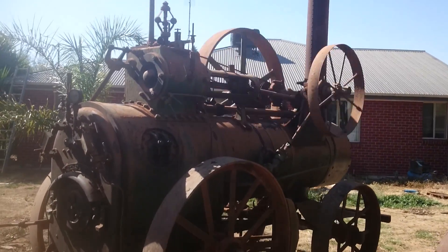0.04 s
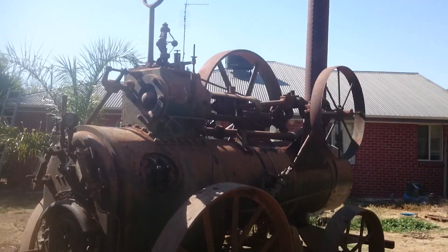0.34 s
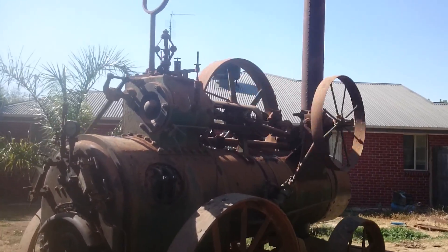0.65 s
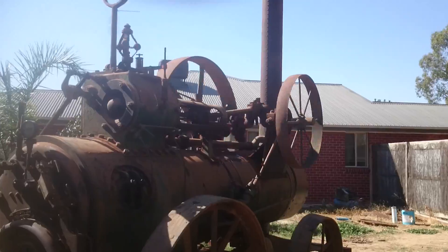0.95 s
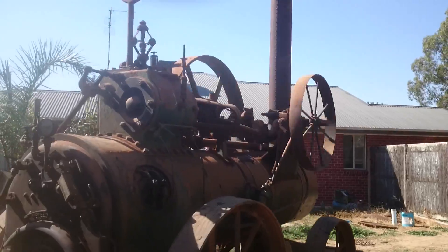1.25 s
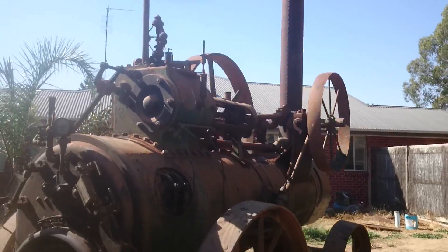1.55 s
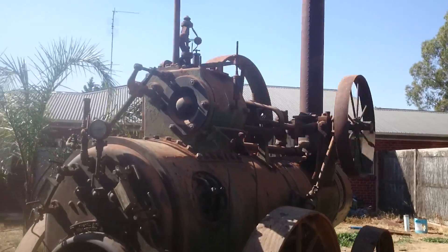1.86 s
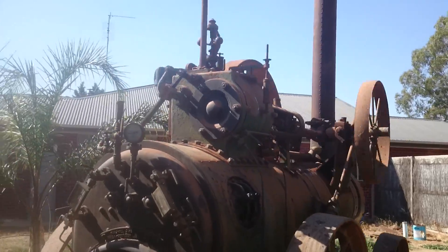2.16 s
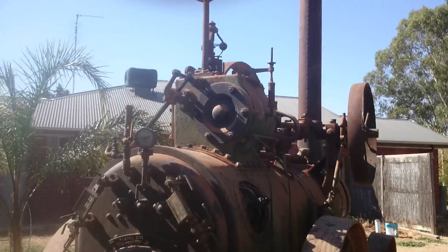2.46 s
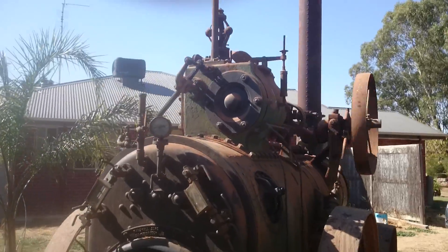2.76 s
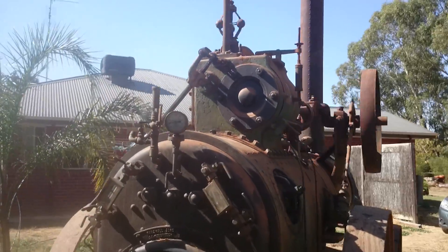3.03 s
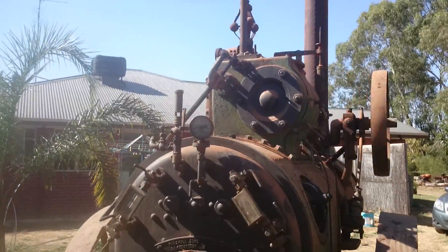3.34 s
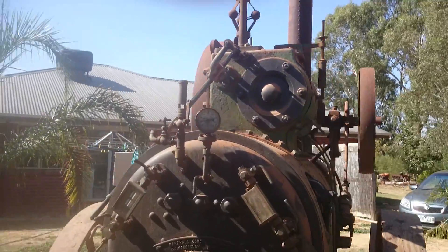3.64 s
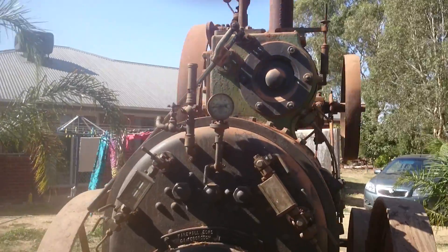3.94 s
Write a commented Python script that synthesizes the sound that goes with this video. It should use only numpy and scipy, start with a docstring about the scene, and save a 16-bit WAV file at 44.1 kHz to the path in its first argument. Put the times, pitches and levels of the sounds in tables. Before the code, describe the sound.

Steam engine ticking over outdoors, with booming puffs, metallic gear rasps and hissing steam.

```python
"""Booming chuffs and rasping gears: a portable steam engine ticks over in a yard at just under 2 turns/s.
Each stroke puffs out through the chimney and rings it; fence and house throw the boom back.
The governor gears bind and rasp about five times a second over churning bearings and swishing slides.
A steam leak hisses, a little louder as the listener walks up to the boiler."""
import sys
import numpy as np
from scipy import signal
from scipy.fft import rfft, irfft
from scipy.io import wavfile

SR = 44100
rng = np.random.default_rng(int(sys.argv[2]) if len(sys.argv) > 2 else 0)


def pcm_store(signal):
    """Save signal as 16-bit PCM."""
    levels = np.round(np.clip(np.atleast_2d(signal), -1, 1) * 32767)
    wavfile.write(sys.argv[1], SR, levels.astype(np.int16).T)


N = 176400
TIME_S = np.arange(N) / SR

# Exhaust strokes, front and back cylinder end in turn.
# Each row: start in seconds, boom in dB, rush in dB, puff in dB.
STROKES = [(0.0874, -16.5, -26.5, -36.5), (0.3493, -21.5, -27.5, -36), (0.6242, -20, -28, -33.5),
           (0.8887, -20.5, -32, -35.5), (1.1647, -18.5, -29.5, -35), (1.4293, -20, -33.5, -36),
           (1.707, -17.5, -29, -34.5), (1.970, -20, -30, -39.5), (2.244, -18, -31.5, -33.5),
           (2.5067, -21.5, -29.5, -38), (2.7835, -18.5, -26.5, -36), (3.0461, -21, -32.5, -39),
           (3.3226, -19.5, -29, -36), (3.5882, -20, -29, -39), (3.8632, -18.5, -25, -38.5)]
# Chimney modes. Each row: frequency in Hz, front-end gain in dB, back-end gain in dB,
# T60 in seconds, lag in seconds.
CHIMNEY_MODES = [(56, -5, -29, 0.15, 0.01436), (66.2, -8, 0, 0.15, -0.0051),
                 (69.2, -3, -14.5, .19, 0.00966), (118.9, -6, -4, 0.16, .0138),
                 (150, -4, -8.5, 0.081, -0.0019), (192.9, -3.5, -11, 0.21, -.0086),
                 (287.5, -3, -2.5, 0.093, -.0009)]
# Chimney turbulence. Each row: frequency in Hz, relative density in dB.
RUSH_SPECTRUM = [(25, -2), (60, 1), (110, -4), (140, -9.5), (190, 7), (235, -3.5), (300, 0), (380, -6),
                 (460, -18.5), (600, -6.5), (800, -27), (2000, -57)]
# Nozzle puff. Each row: frequency in Hz, relative density in dB.
PUFF_SPECTRUM = [(150, -52), (450, -11), (620, 10), (800, 7.5), (1300, 6.5), (2500, -10), (5000, -58)]
# Fence and house echoes. Each row: delay in seconds, gain in dB.
ECHOES = [(0.035, -8.5), (.0533, -6.5), (0.0709, -10.5)]

# Governor rasps. Each row: peak time in seconds, level in dB, half-width in seconds,
# shrill share in dB, low-mode offset in dB.
RASPS = [(0.046, -26.5, 0.018, -4.5, -2.5), (0.18, -43, 0.024, 11.5, 4), (0.259, -39, 0.034, 4, -4),
         (0.434, -30.5, 0.015, -1, 3), (0.821, -42, 0.036, -15, -1), (1.008, -26, 0.022, 4, -6),
         (1.141, -38.5, 0.005, 14.5, -16), (1.208, -35.5, 0.008, 0, -2), (1.406, -30, 0.014, -10, -0.5),
         (1.579, -30.5, .015, 5, -0.5), (1.805, -38, 0.057, -28, 0.5), (1.988, -24, 0.02, -11.5, 0),
         (2.163, -29, 0.019, -34, -1.5), (2.397, -27.5, 0.017, -12, -5), (2.565, -26.5, 0.02, -9, 0),
         (2.744, -28, 0.0071, -18, -5), (2.809, -32.5, 0.0058, 7, -0.5), (2.956, -25, 0.015, -13, -5.5),
         (3.126, -35, 0.025, -18, -2), (3.256, -31, 0.0079, -13, -18), (3.525, -28, 0.024, -7.5, -10),
         (3.736, -37, .018, -10, 2), (3.936, -31, 0.026, -24, -7)]
# Teeth snapping free. Each row: time in seconds, impulse level in dB.
SNAPS = [(1.0056, -2.5), (1.0114, -22), (1.9863, -20), (2.5441, 0)]
# Gear casting modes. Each row: frequency in Hz, relative gain in dB, T60 in seconds.
GEAR_MODES = [(612, -5, .13), (1215, -1.5, .055), (1478, -1.5, .038), (1860, 0, .034), (1666, -9, .04),
              (2170, -2, .05), (2285, 2, .016), (2452, -1, .024), (3796, 2, .033), (3985, 2, .045),
              (4195, 4.5, .035), (4290, 9, .018), (5580, -6, .03)]
# Bare tooth contact. Each row: frequency in Hz, relative density in dB.
GRIT_SPECTRUM = [(200, -38), (500, -42), (1000, -31), (2000, 9), (3000, 11.5), (4300, 29), (6500, -25),
                 (8000, 11), (15000, -12)]

# Running bearings and slides. Each row: frequency in Hz, relative density in dB.
CHURN_SPECTRUM = [(30, -25), (62, 13.5), (120, -1.5), (300, 7.5), (450, -1), (620, -0.5), (900, 2),
                  (1300, -1.5), (1900, 0.5), (2900, -1), (4500, 6), (8000, -49)]
# Steam leak. Each row: frequency in Hz, relative density in dB.
LEAK_SPECTRUM = [(800, -35), (2500, -35), (3500, 1), (5000, 7.5), (6300, 10), (7500, 5), (9000, 2.5),
                 (11000, 1.5), (13000, 3.5), (16000, 2.5)]
# Hiss along the walk. Each row: time in seconds, overall gain in dB, treble gain in dB,
# band gain in dB, band centre in Hz.
HISS_PATH = [(0, -1, -5, 5.5, 10800), (.5, 0.5, -7, 4.5, 10800), (1.0, 0.5, -4, 7.5, 10800),
             (1.448, 0, -3, 7.5, 10850), (1.82, 3, -3.5, 7.5, 10800), (2.1, 0.5, -3.5, 10, 10700),
             (2.401, 1.5, -3.5, 9, 10400), (2.75, 0, 0, 4.5, 9980), (3.101, 0.5, -4.5, 8.5, 9700),
             (3.38, 2.5, -3.5, 11.5, 9900), (3.62, -1, 3.5, 3, 9630), (3.85, -1.5, 2.5, 7.5, 9920),
             (4, 3, 1.5, -3, 10400)]
# Two top bands of the hiss. Each row: time in seconds, lower-band gain in dB, upper-band gain in dB.
HISS_SHEEN = [(0, 1, -3), (1.7, 1, -12), (2.1, 1, -1), (2.4, -6, 0), (3.2, 0, 1), (3.6, -8, -15)]

# Microphone port response. Each row: frequency in Hz, left gain in dB, right gain in dB.
PORT_RESPONSE = [(60, -4.5, 3), (194, -3, -1.9), (790, -1.94, -3.5), (2400, 3.5, 3.5), (3450, 1.5, -1),
                 (4130, -1, -11), (5450, -5.5, 0), (5800, -17, 2), (6760, -8, -0.5), (8050, -3.5, -3),
                 (9200, -0.5, -4.5), (10820, 7.5, -7), (12600, -1, 0.5), (13100, -7.5, 3.5),
                 (14340, 0, 5.5), (15700, -12, 9.5)]
# Stereo coherence. Each row: frequency in Hz, left-right likeness from 0 to 1.
COHERENCE = [(60, 0.35), (300, 0.9), (700, 0.91), (1400, 0.47), (2500, 0.73), (4000, 0), (15000, 0)]


def from_db(db):
    """Decibels to gain."""
    return 10 ** (np.asarray(db) / 20)


def unit_rms(x):
    """Scale to unit rms."""
    return x / np.sqrt(np.mean(x ** 2) + 1e-20)


def bell(offset, sigma):
    """Gaussian of unit height."""
    return np.exp(-0.5 * (offset / sigma) ** 2)


def at_hz(points, hz, column=1):
    """Interpolate a table column over log frequency."""
    table = np.array(points)
    return np.interp(np.log(hz + 1e-9), np.log(table[:, 0]), table[:, column])


def colour(x, spectrum, column=1):
    """Filter by a smooth spectrum."""
    size = N + SR // 10
    gain = from_db(at_hz(spectrum, np.fft.rfftfreq(size, 1 / SR), column))
    return irfft(rfft(x, size) * gain, size)[..., :N]


def noise(spectrum):
    """Unit-rms stereo noise, partly coherent below 4 kHz."""
    hz = np.fft.rfftfreq(N, 1 / SR)
    coherence = at_hz(COHERENCE, hz)
    mid, side = rfft(rng.standard_normal((2, N)))
    stereo = np.sqrt(1 + coherence) * mid + np.sqrt(1 - coherence) * side * [[1], [-1]]
    return unit_rms(irfft(stereo * from_db(at_hz(spectrum, hz)), N))


def drift(corner_hz):
    """Slow random wander, unit rms."""
    hz = np.fft.rfftfreq(N, 1 / SR)
    return unit_rms(irfft(rfft(rng.standard_normal(N)) / (1 + (hz / corner_hz) ** 2), N))


def ring(x, hz, t60_s):
    """One damped mode."""
    radius, angle = from_db(-60 / (t60_s * SR)), 2 * np.pi * hz / SR
    return signal.lfilter([0, np.sin(angle)], [1, -2 * radius * np.cos(angle), radius ** 2], x + 1e-18)


def burst(start_s, rise_s, fall_s):
    """Linear rise, exponential fall."""
    age_s = TIME_S - start_s
    return np.clip(age_s / rise_s, 0, 1) * np.exp(-np.clip((age_s - rise_s) / fall_s, 0, 20))


def delayed(pair, delay_s):
    """Delay two signals alike."""
    return np.array([np.interp(TIME_S - delay_s, TIME_S, x, left=0) for x in pair])


def lag_right(x, lag_s):
    """Mono to stereo, right side late."""
    return np.array([x, np.interp(TIME_S - lag_s, TIME_S, x)])


def exhaust(valve_rise_s=0.00058, echo_cutoff_hz=365):
    """Each stroke: nozzle puff, steam rush and a pressure pulse that rings the chimney. Dull echoes."""
    pulses, rush, puff, boom = np.zeros((2, N)), 0, 0, 0
    for k, (start_s, boom_db, rush_db, puff_db) in enumerate(STROKES):
        age = np.clip((TIME_S - start_s) / valve_rise_s, 0, 20)
        pulses[k % 2] += from_db(boom_db) * age * np.exp(-age) / (valve_rise_s * SR)
        rush += from_db(rush_db) * burst(start_s - 0.011, rise_s=0.009, fall_s=0.027)
        puff += from_db(puff_db) * burst(start_s - 0.019, rise_s=0.0036, fall_s=0.026)
    for hz, front_db, back_db, t60_s, lag_s in CHIMNEY_MODES:
        front, back = delayed(pulses, lag_s)
        boom += ring(from_db(front_db) * front + from_db(back_db) * back, hz, t60_s)
    chimney = boom + rush * noise(RUSH_SPECTRUM)
    dull = signal.sosfilt(signal.butter(1, echo_cutoff_hz, fs=SR, output="sos"), chimney)
    echoes = sum(from_db(db) * delayed(dull, delay_s) for delay_s, db in ECHOES)
    return chimney + puff * noise(PUFF_SPECTRUM) + echoes


def governor(idle_db=-57.5, grit_db=-5, shrill_hz=6290, shrill_t60_s=0.026, shrill_db=-3):
    """The gears bind once per governor turn: the scrape swells and fades, at times ringing shrilly."""
    load = low_load = high_load = from_db(idle_db)
    shrill_load = 0
    for peak_s, db, half_width_s, share_db, low_db in RASPS:
        swell = from_db(db) / np.cosh(np.clip((TIME_S - peak_s) / half_width_s * np.pi / 2, -20, 20))
        load = load + swell
        low_load = low_load + swell * from_db(low_db)
        bite_db = 8 + 0.47 * min(share_db, 0)  # harder binding rings the high modes more
        high_load = high_load + swell * from_db(bite_db)
        shrill_load = shrill_load + swell * from_db(share_db)
    teeth, snaps = tooth_catches(), tooth_snaps()
    body = gear_casting(teeth * low_load + snaps, teeth * load + snaps, teeth * high_load + snaps)
    grit = colour(teeth * load, GRIT_SPECTRUM) / np.std(colour(teeth, GRIT_SPECTRUM))
    grit = lag_right(grit, lag_s=0.00006)  # right port is further from the gears
    shrill = ring(teeth * shrill_load, shrill_hz, shrill_t60_s)
    shrill /= np.std(ring(teeth, shrill_hz, shrill_t60_s))
    return body + from_db(grit_db) * grit + from_db(shrill_db) * shrill


def tooth_catches(rate_per_s=1400, spread_db=3.5):
    """Dry teeth catch and slip: dense, uneven clicks."""
    sizes = from_db(spread_db * np.minimum(rng.exponential(1, N), 4))
    signs = rng.choice([-1, 1], N)
    return unit_rms(sizes * signs * (rng.random(N) < rate_per_s / SR))


def tooth_snaps():
    """Single teeth snap free and strike the casting."""
    impulses = np.zeros(N)
    for time_s, db in SNAPS:
        impulses[int(time_s * SR)] = from_db(db)
    return impulses


def gear_casting(low_force, mid_force, high_force, low_below_hz=1300, high_above_hz=3000):
    """Tooth forces ring the casting in three ranges; the high modes differ most between the ears."""
    body, energy = np.zeros((2, N)), 0
    for k, (hz, db, t60_s) in enumerate(GEAR_MODES):
        force = high_force if hz > high_above_hz else low_force if hz < low_below_hz else mid_force
        mode = from_db(db) * (-1) ** k * ring(force, hz, t60_s)
        phase_rad = np.arccos(at_hz(COHERENCE, hz))
        body += lag_right(mode, phase_rad / (2 * np.pi * hz))
        energy += from_db(db) ** 2 * t60_s * SR / (4 * np.log(1000))
    return body / np.sqrt(energy)


def bearings(level_db=-42, flutter_db=2):
    """Running bearings churn with a slight flutter."""
    return from_db(level_db + flutter_db * drift(corner_hz=27)) * noise(CHURN_SPECTRUM)


def slides(level_db=-54.5, fade_db_per_s=2.5, start_hz=2440, sag_hz_per_s=45, half_width_hz=170):
    """A swish after each front stroke, duller and fainter as the listener moves behind the boiler."""
    lag_s, sigma_s = 0.044, 0.092
    hz, frame_s, white = signal.stft(noise([(1000, 0)]), SR, nperseg=1024)
    swell = sum(bell(frame_s - start_s - lag_s, sigma_s) for start_s, *_ in STROKES[::2])
    centre_hz = start_hz - sag_hz_per_s * frame_s
    resonance = 1 / (1 + ((hz[:, None] - centre_hz) / half_width_hz) ** 2)
    fade = from_db(-fade_db_per_s * frame_s)
    swish = signal.istft(white * resonance * swell * fade, SR)[1][:, :N]
    return from_db(level_db) * unit_rms(swish)


def steam_leak(base_db=-34, flutter_db=1.31, treble_hz=7070, sheen_hz=(13900, 15450)):
    """A smooth jet whose level and treble shift as the listener moves round it."""
    band_sigma_hz, sheen_sigma_hz = 800, 380
    hz, frame_s, bins = signal.stft(noise(LEAK_SPECTRUM), SR, nperseg=512)
    hz = hz[:, None]
    path_s, *columns = np.transpose(HISS_PATH)
    overall_db, treble_db, band_db, centre_hz = [np.interp(frame_s, path_s, c) for c in columns]
    shelf = 1 - 1 / (1 + (hz / treble_hz) ** 10)
    gain_db = overall_db + treble_db * shelf + band_db * bell(hz - centre_hz, band_sigma_hz)
    sheen_s, *sheen_db = np.transpose(HISS_SHEEN)
    for top_hz, db in zip(sheen_hz, sheen_db):
        gain_db += np.interp(frame_s, sheen_s, db) * bell(hz - top_hz, sheen_sigma_hz)
    jet = signal.istft(bins * from_db(gain_db), SR)[1][:, :N]
    return from_db(base_db + flutter_db * drift(corner_hz=11.4)) * jet


def yard(x, t60_s=0.1, level_db=-12):
    """Faint, short scatter from fence, house and ground."""
    scatter = noise([(40, -9.0), (300, 8.5), (3000, 12.5), (12000, -6.5)])  # Hz, dB
    tail = scatter[:, :SR] * from_db(-60 * TIME_S[:SR] / t60_s)
    tail /= np.sqrt(np.sum(tail ** 2) / 2)
    return from_db(level_db) * signal.fftconvolve(x, tail, axes=1)[:, :N]


def scene():
    """Engine, yard scatter and leak."""
    engine = exhaust() + governor() + bearings() + slides()
    return engine + yard(engine) + steam_leak()


def record(dry, low_cut_hz=32, high_cut_hz=15900):
    """Each microphone port colours its side; deep bass and top are cut."""
    left = colour(dry[0], PORT_RESPONSE, column=1)
    right = colour(dry[1], PORT_RESPONSE, column=2)
    heard = signal.sosfilt(signal.butter(3, low_cut_hz, "high", fs=SR, output="sos"), [left, right])
    return signal.sosfilt(signal.ellip(12, 0.2, 80, high_cut_hz, fs=SR, output="sos"), heard)


dry = scene()
out = record(dry)
pcm_store(out)
```